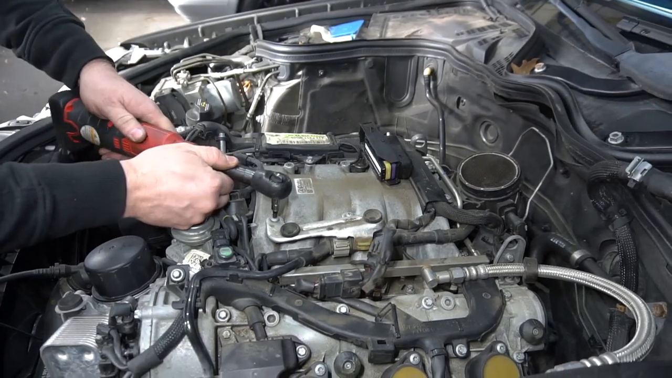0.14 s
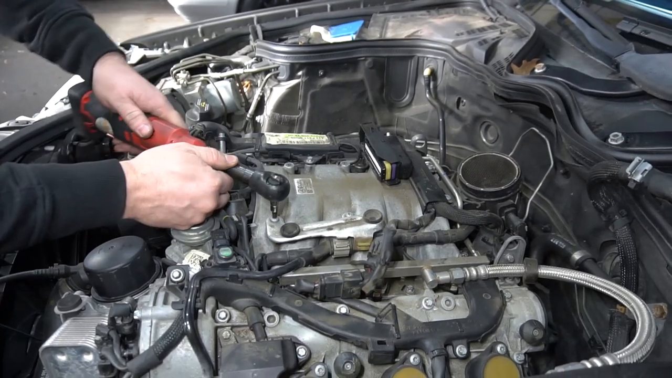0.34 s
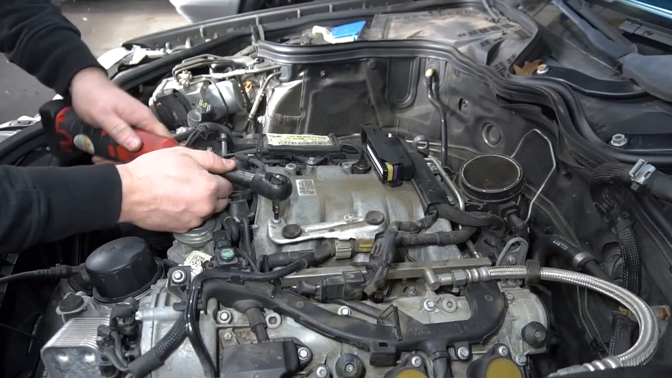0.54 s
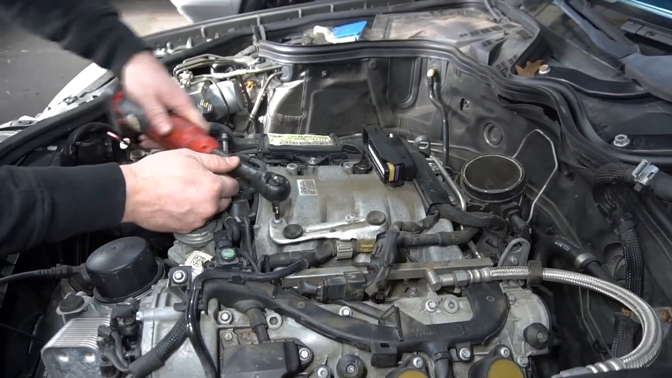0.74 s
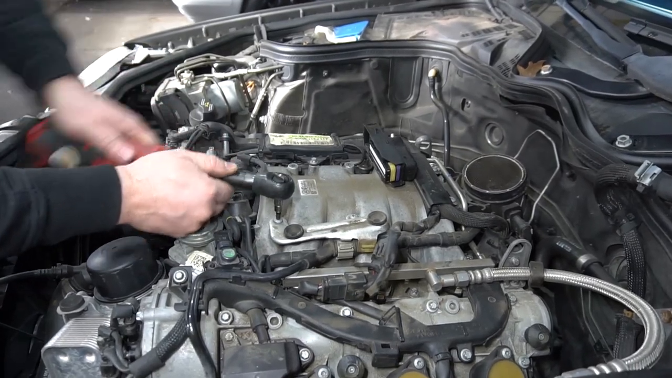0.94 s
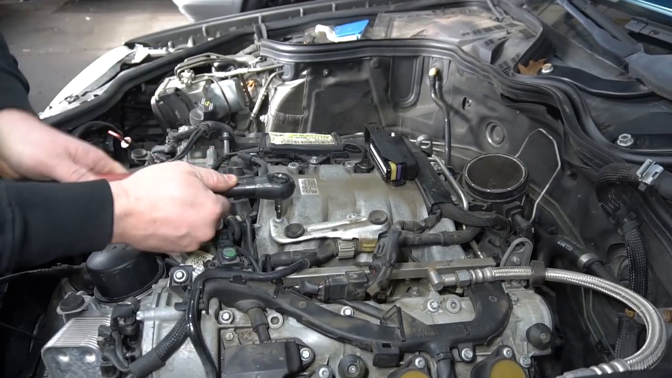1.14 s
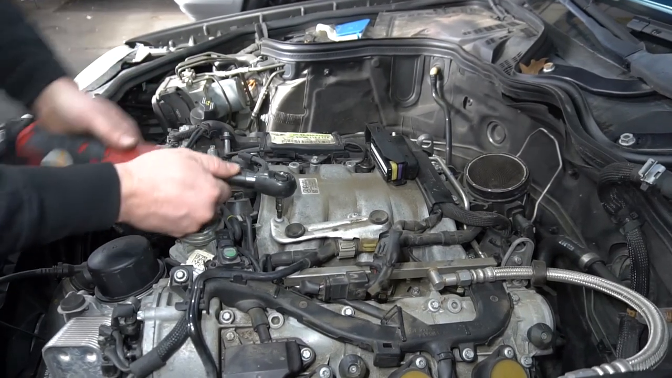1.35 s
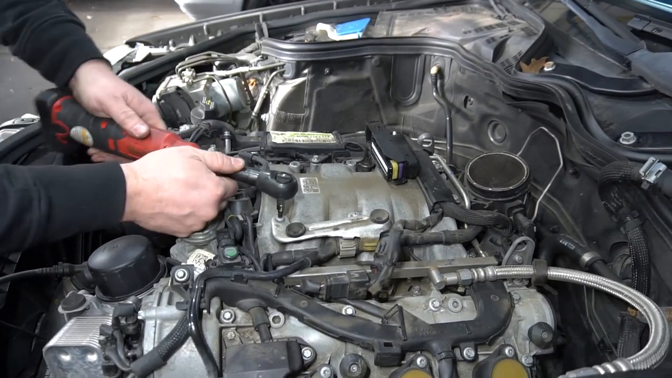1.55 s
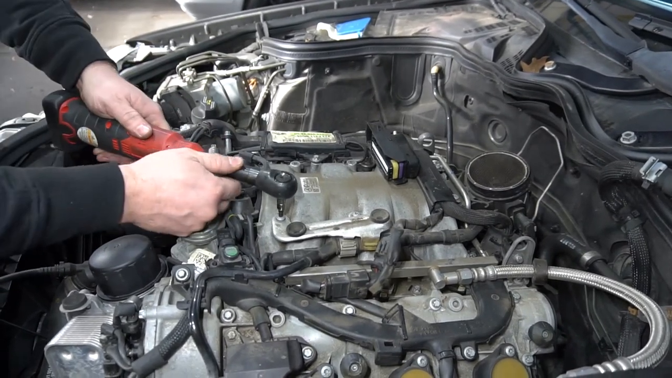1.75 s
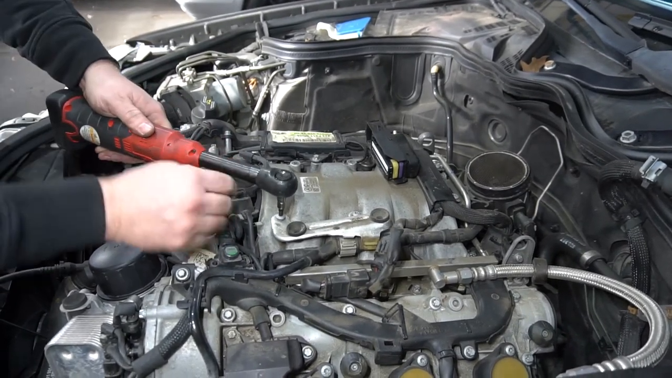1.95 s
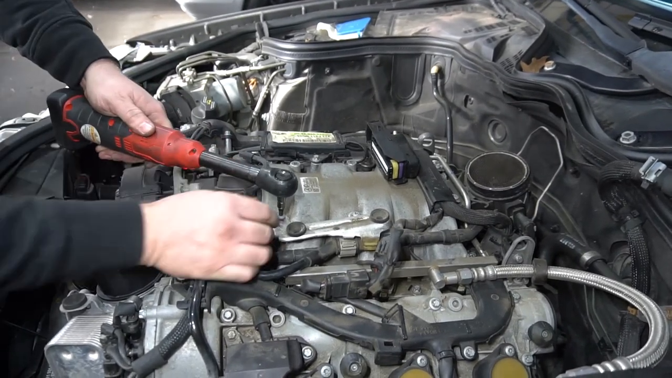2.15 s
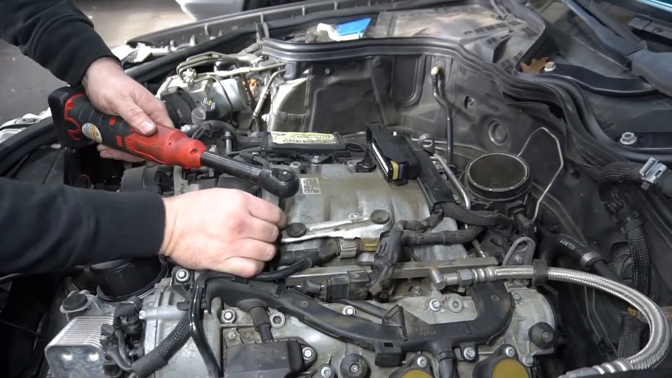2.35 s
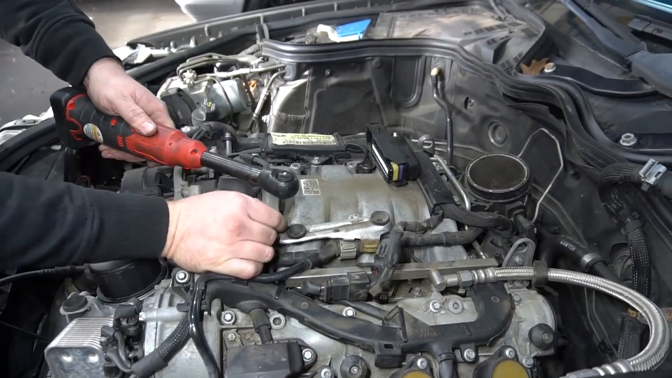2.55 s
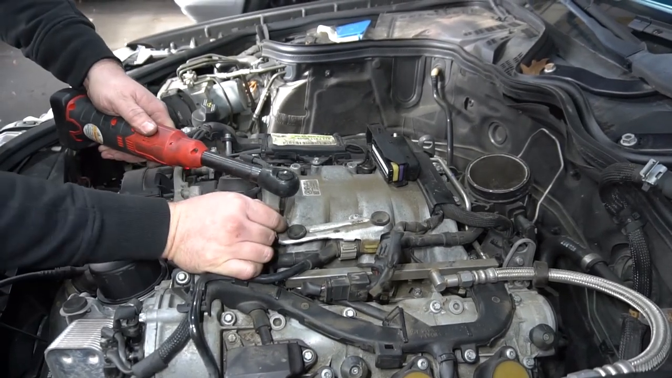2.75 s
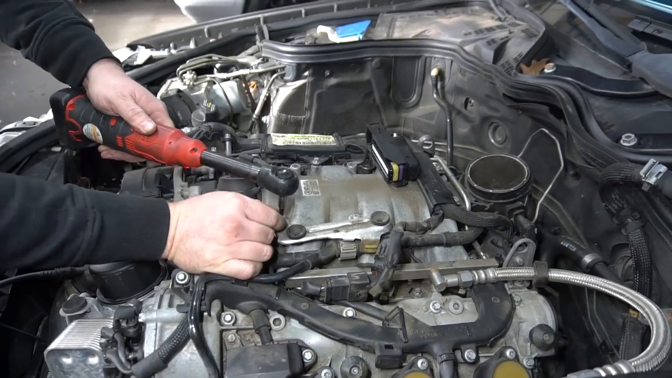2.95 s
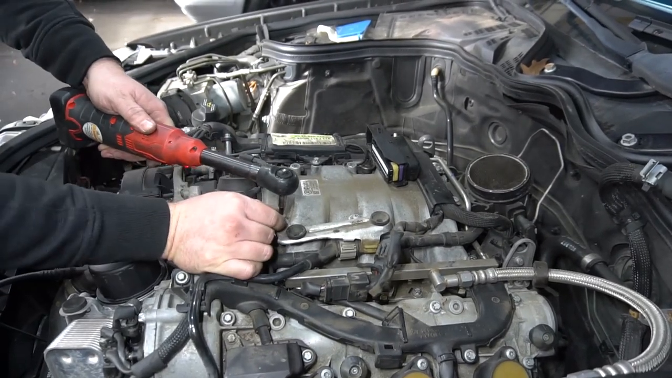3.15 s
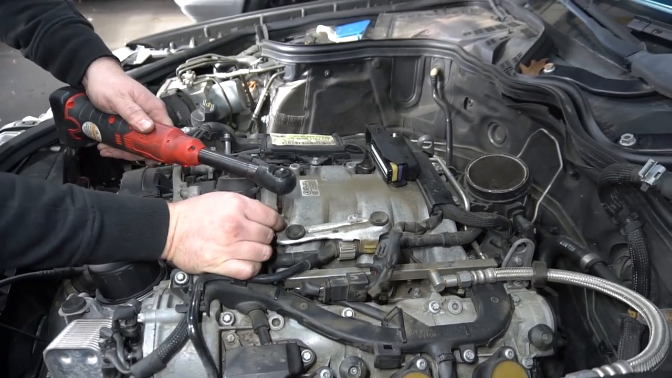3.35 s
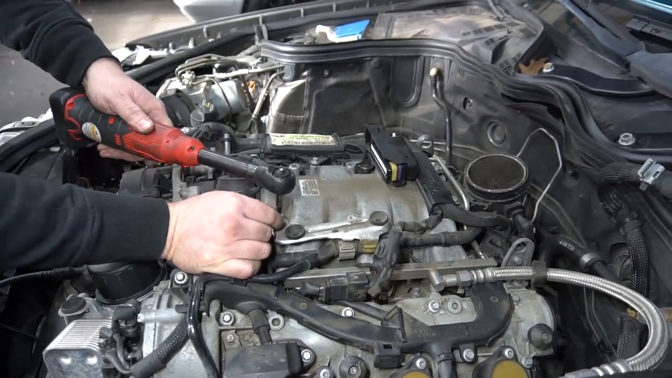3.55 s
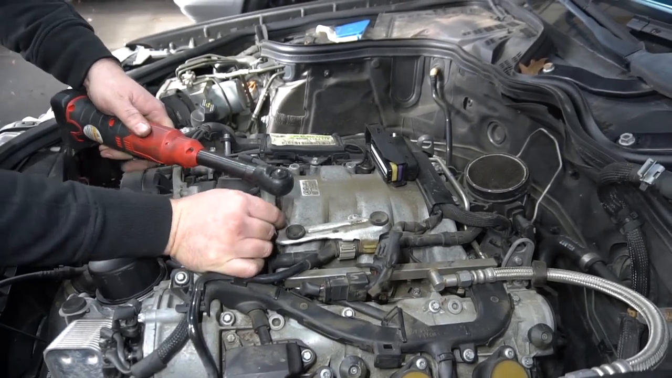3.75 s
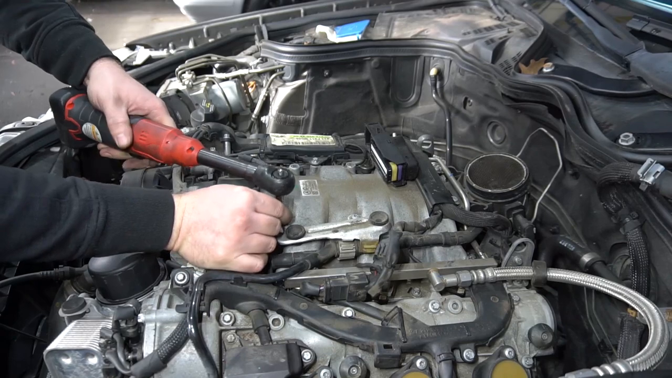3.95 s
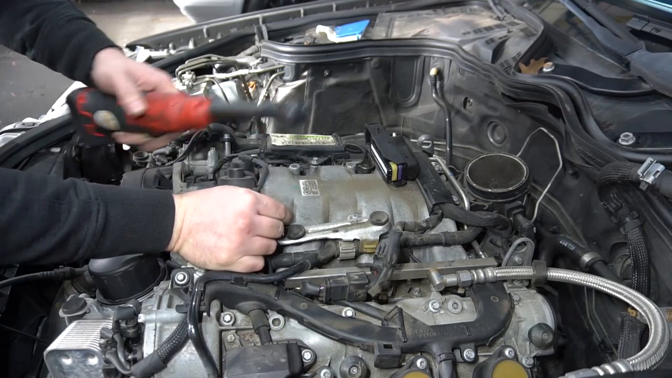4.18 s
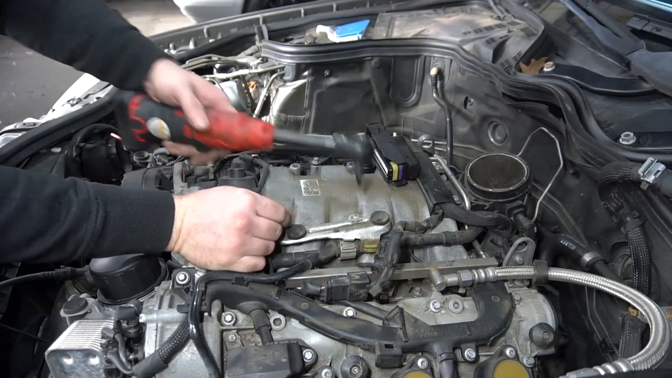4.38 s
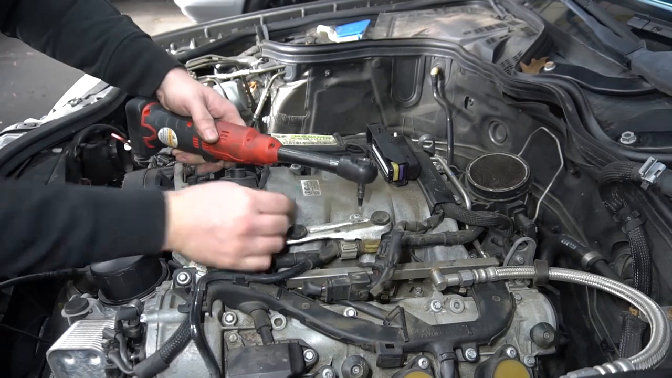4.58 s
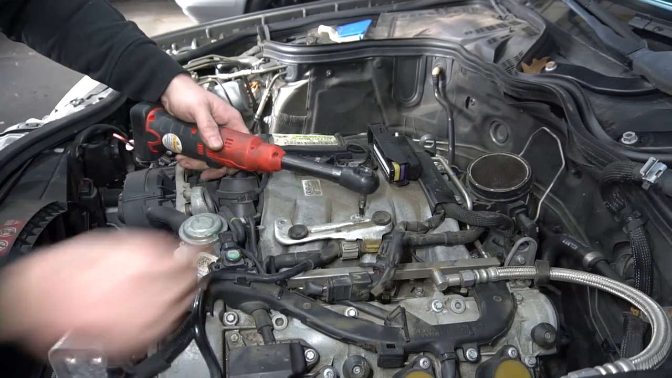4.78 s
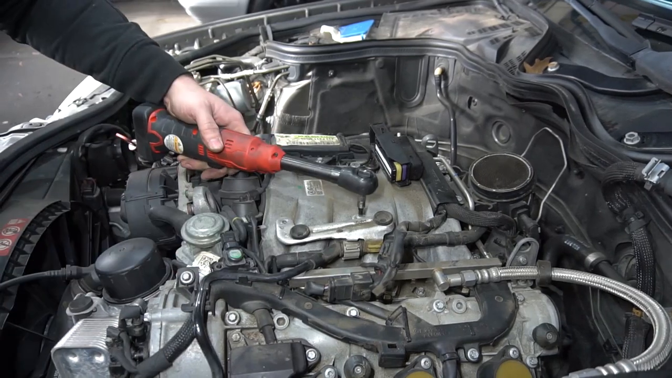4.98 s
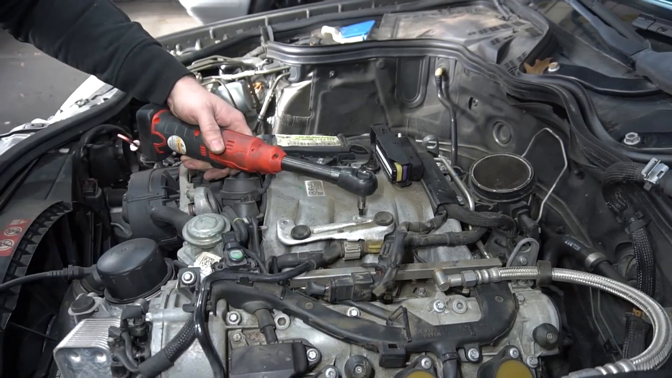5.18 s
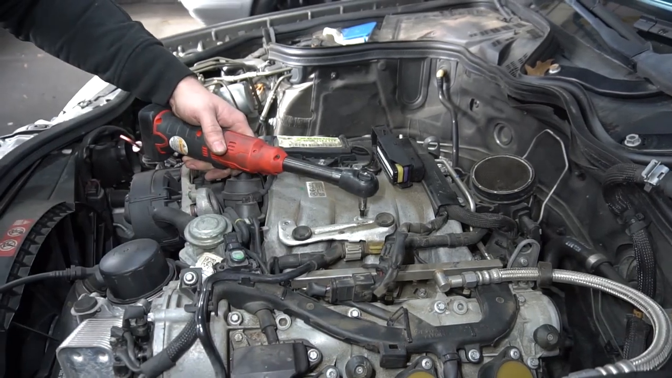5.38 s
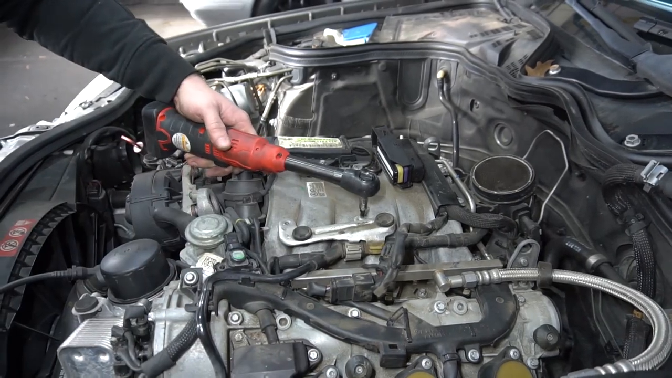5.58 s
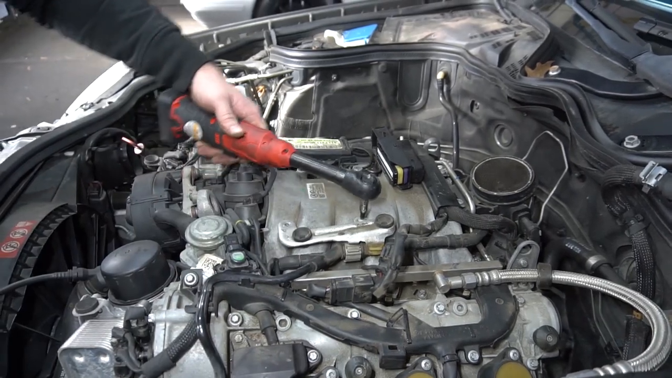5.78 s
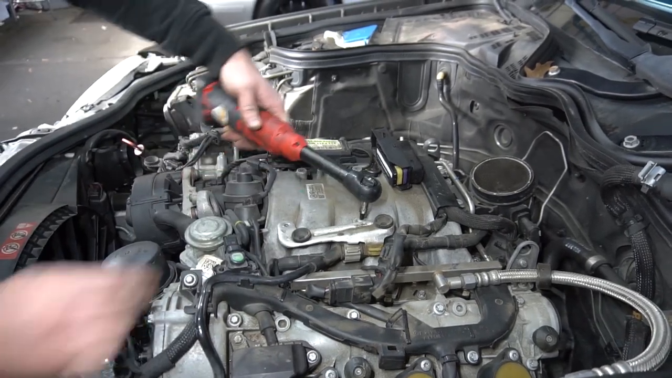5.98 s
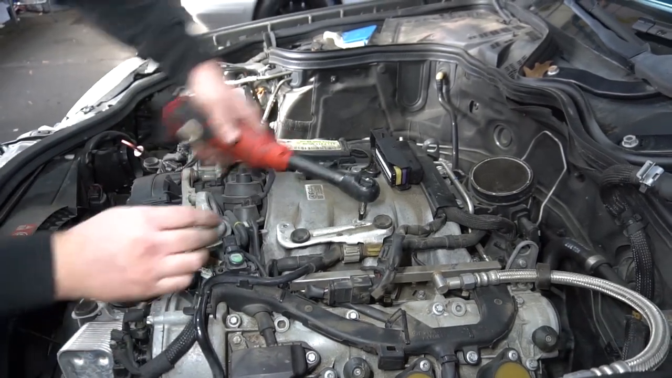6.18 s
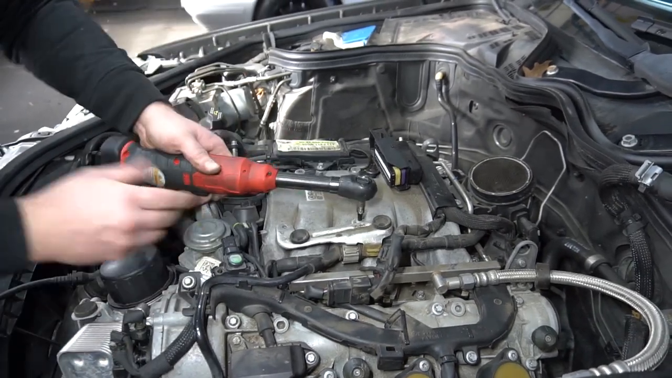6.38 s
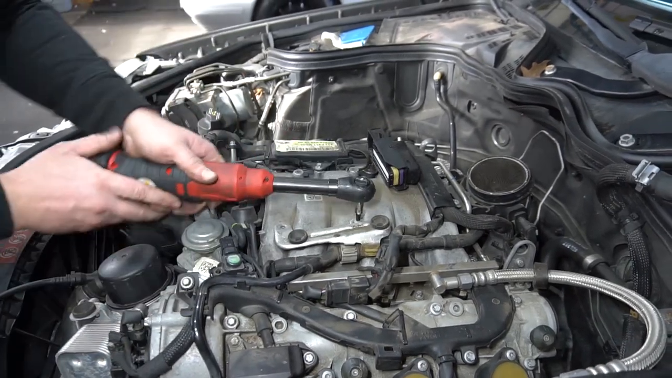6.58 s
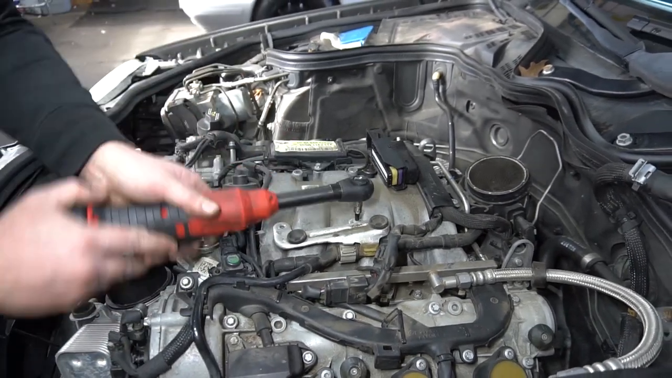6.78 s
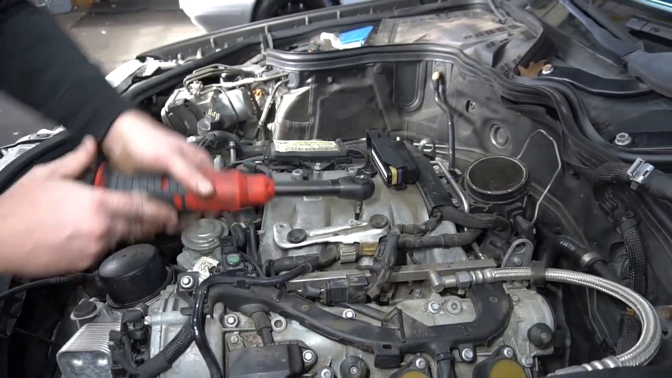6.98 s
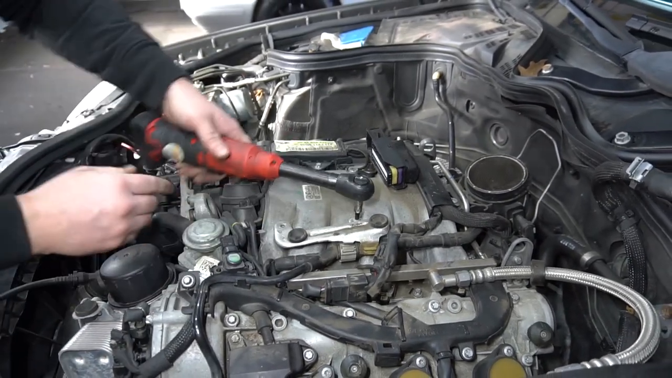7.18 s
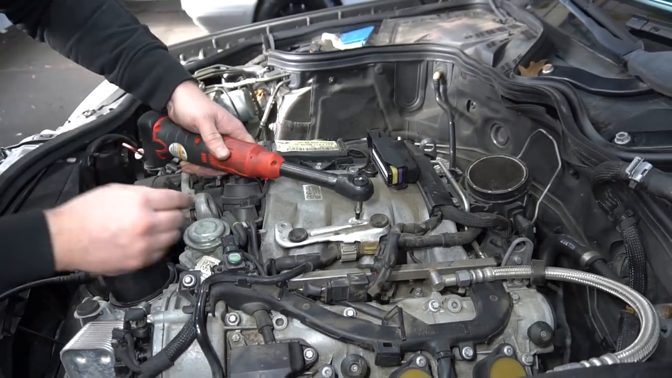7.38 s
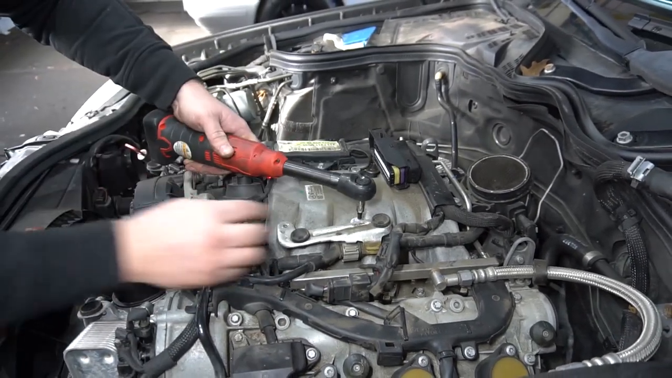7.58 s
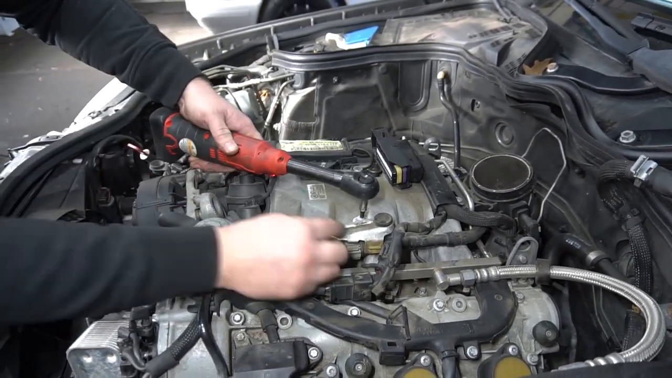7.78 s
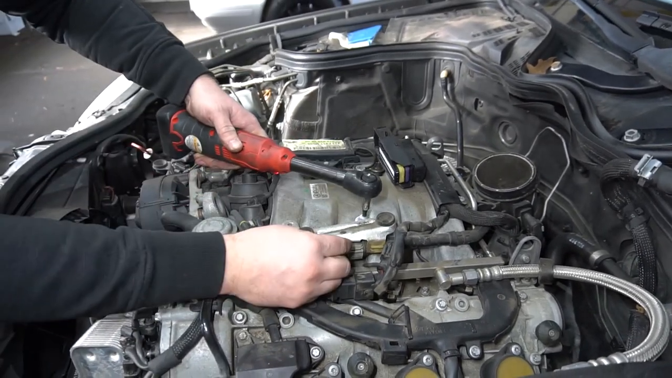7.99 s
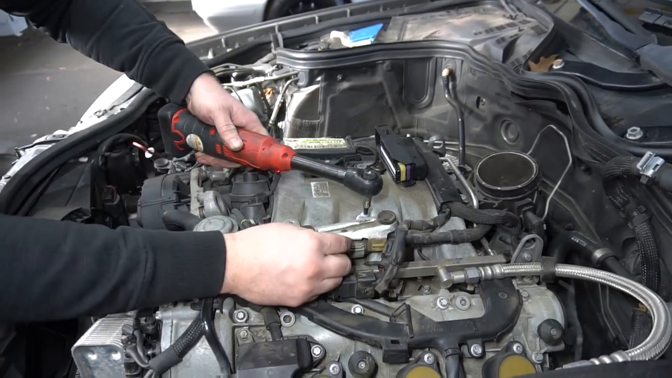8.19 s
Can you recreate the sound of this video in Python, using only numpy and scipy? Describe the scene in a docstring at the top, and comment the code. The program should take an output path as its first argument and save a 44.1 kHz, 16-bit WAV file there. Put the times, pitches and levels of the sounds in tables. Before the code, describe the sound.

Close stereo pickup in a moderately reverberant workshop. A few small metal clicks and a sharp clack precede a long, harsh electric ratchet run with gear whine and rapid knocking. It winds down into loose clacks. A bolt drops, knocks a hollow panel and rings on metal. After light tool clicks, the ratchet bursts again to the end. A low machine hum sits beneath, ducking under the tool.

```python
"""A cordless electric ratchet backs bolts out of an engine in two runs, close by, in a workshop.
Its crank turns about 104 times a second at full speed: knocks, rasp noise, buzz lines and gear whine.
Separate clicks and scrapes are filtered noise; a dropped bolt cracks and rings in decaying modes.
A machine drone of noise and wavering sines lies beneath; gain control ducks it under the tool
and lets it swell back slowly."""
import sys
import numpy as np
from scipy import signal
from scipy.fft import rfft, irfft, next_fast_len
from scipy.io import wavfile
from scipy.ndimage import uniform_filter1d

SR = 44100
rng = np.random.default_rng(int(sys.argv[2]) if len(sys.argv) > 2 else 0)


def generate_wav(signal):
    """Clip the signal to [-1, 1] and save it as 16-bit WAV at the path in sys.argv[1]."""
    frames = np.transpose(np.atleast_2d(signal))
    scaled = np.clip(frames, -1, 1) * 32767
    pcm = np.round(scaled).astype(np.int16)
    wavfile.write(sys.argv[1], SR, pcm)


N = 362943
TIME = np.arange(N) / SR

# contacts in one crank turn: [phase/turn, relative level/dB]
CONTACTS = [(0.019, -6), (.14, 5), (.47, 0), (0.724, -2)]
# stereo width of tool and handling: [f/Hz, side re mid/dB]
TOOL_SIDE = [(60, 1), (140, -14.5), (350, -14.5), (840, -12.5), (2020, -11.5), (4880, -0.5), (11800, -1)]
# crank turns per s: free running, and stalled
FREE_HZ, STALL_HZ = 104.4, 12


def amp(db):
    """Decibels to gain."""
    return 10 ** (np.asarray(db) / 20)


def unit(x):
    """Scales to an rms of 1."""
    return x / np.sqrt(np.mean(x ** 2) + 1e-20)


def read(points, hz):
    """Interpolates a spectrum table on a log-frequency axis."""
    f, value = np.transpose(points)
    return np.interp(np.log(hz + 1), np.log(f + 1), value)


def lifts(rings, hz):
    """The dB that a set of resonances adds at each frequency."""
    return sum(db / (1 + (2 * (hz - f) / width) ** 2) for f, width, db in rings)


def colour(x, db_at):
    """Filters by a rule that gives dB for each frequency."""
    size = next_fast_len(x.shape[-1] + 512, True)
    gain = amp(db_at(np.fft.rfftfreq(size, 1 / SR)))
    return irfft(rfft(x, size) * gain, size)[..., :x.shape[-1]]


def band(x, hz, width_hz):
    """The part of a sound that one resonance passes."""
    return signal.lfilter(*signal.iirpeak(hz, hz / width_hz, SR), x)


def band_rms(x, lo_hz, hi_hz):
    """The rms of one band of a sound."""
    sos = signal.butter(4, [lo_hz, hi_hz], "band", fs=SR, output="sos")
    return np.std(signal.sosfilt(sos, x))


def wander(rate_hz):
    """Random curve of rms 1 through rate_hz knots per s; constant once 4096 knots are used up."""
    knots = rng.standard_normal(4096)
    return unit(np.interp(TIME * rate_hz, np.arange(len(knots)), knots))


def add(mix, s, sound):
    """Mixes a sound in at time s."""
    part = mix[..., max(round(s * SR), 0):][..., :sound.shape[-1]]
    part += sound[..., :part.shape[-1]]


def spread(pair, side):
    """Two unrelated versions of a sound become its middle and its sides."""
    wide = colour(pair[1], lambda hz: read(side, hz))
    return np.array([pair[0] + wide, pair[0] - wide])


def scatter(t60_s, rise_s, size=4096):
    """A scattered blow: two dense, evenly coloured decays of energy 1."""
    t = np.arange(size) / SR
    shape = amp(-60 * t / max(t60_s, .002)) * (1 - np.exp(-t / max(rise_s, 1e-5))) ** 2
    x = rng.standard_normal((2, size)) * shape
    # alternate between a flat spectrum and the wanted envelope
    for _ in range(3):
        x = irfft(np.exp(1j * np.angle(rfft(x))))
        x *= shape / np.sqrt(abs(uniform_filter1d(x ** 2, 96)) + 1e-14)
    return x / np.linalg.norm(x, axis=1, keepdims=True)


def ratchet(run, body, rings, pawl_modes, buzz, lean, knock_db, rasp_db, buzz_db, whine_db,
            level_db, treble_db, rasp_decay_turns, flutter_db, flare_db, swell_rad):
    """One run: knocks and gear rasp ring the tool; crank buzz and gear whine follow its speed."""
    # dB for each halving of crank speed
    slow_level_db, slow_treble_db, slow_knock_db = -8, -1.5, -4
    # swings in dB, taken with this sign where the socket rubs hardest, opposite half a turn later
    wobble_level_db, wobble_treble_db, wobble_knock_db, wobble_buzz_db = -1.2, 0.8, -2, 4.5
    crank_per_socket, mesh_per_crank = 20, 41.6
    on, off, drag_hz, rub_s = run
    crank_hz = crank_speed(on, off, drag_hz)
    running = (TIME > on) & (crank_hz > STALL_HZ)
    turns = np.cumsum(crank_hz * running) / SR
    halvings = np.log2(FREE_HZ / crank_hz)
    socket_rad = 2 * np.pi * (turns - np.interp(rub_s, TIME, turns)) / crank_per_socket
    wobble = np.cos(socket_rad)

    # the slack mechanism clatters harder once the trigger is let go
    force_db = slow_knock_db * halvings + 4.5 * (TIME > off)
    hardness = amp(knock_db + force_db + wobble_knock_db * wobble + 2.4 * wander(8.1))
    strikes = knocks(turns, running, jitter_s=.000035, uneven_db=4.5, t60_s=0.021) * hardness

    # rasp is strongest at the start of each turn; its fast flutter freezes after 4.55 s
    chatter_db = flutter_db * wander(900) + wander(45)
    gate = (0.75 + np.exp(-(turns % 1) / rasp_decay_turns)) * amp(chatter_db)
    rasp = amp(rasp_db) * unit(gate) * rng.standard_normal((2, N))
    drive = (strikes + rasp) / np.hypot(hardness, amp(rasp_db))
    # last term: 9 dB shelf cut below about 520 Hz
    noise = colour(drive, lambda hz: read(body, hz) + lifts(rings, hz) - 9 / (1 + (hz / 520) ** 4))

    # each resonance flares and fades on its own as the loose socket rattles on the bolt
    for ring_hz, _, _ in rings:
        flare = unit(amp(flare_db * np.tanh(wander(80))))
        noise += band(noise, ring_hz, width_hz=450) * (flare - 1)
    noise /= band_rms(noise[0, running], 800, 5000)

    # replace the band above 5 kHz by one of set level
    treble = colour(noise, lambda hz: -20 * np.log10(1 + (5000 / (hz + 1)) ** 12))
    shine_db = treble_db + slow_treble_db * halvings + wobble_treble_db * wobble + 0.24 * wander(12)
    noise += treble * (amp(shine_db) / np.std(treble[0, running]) - 1)
    noise += pawl(pawl_modes, turns, running, socket_rad) * amp(force_db)
    # the upper mids swell once per socket turn
    noise += band(noise, 2550, 600) * (amp(2.0 * np.cos(socket_rad - swell_rad)) - 1)

    settled = (crank_hz / FREE_HZ) ** 5
    lines = crank_buzz(buzz, turns, running, wobble_buzz_db * wobble)
    whine = gear_whine(mesh_per_crank * crank_hz, on, settled, whine_db)
    # the buzz only comes out clean near full speed
    noise[0] += amp(buzz_db) * lines * settled + whine

    loudness = amp(level_db + slow_level_db * halvings + wobble_level_db * wobble)
    # the gears take up their slack with a 7 ms time constant
    take_up = (1 - np.exp(-np.maximum(TIME - on, 0) / .007)) ** 2
    out = spread(noise, TOOL_SIDE) * loudness * take_up * uniform_filter1d(running * 1., 100)
    return colour(out, lambda hz: np.outer([.5, -.5], read(lean, hz)))


def crank_speed(on, off, drag_hz):
    """Turns per s: soft start, spin-up as the bolt loosens, coast-down against friction."""
    kick_hz, friction_hz_per_s = 26, 76  # kick speed is before bolt drag
    soft_start_s, spin_up_s, loosen_s, coast_s = .025, .062, .4, .34
    driven, coasting = np.clip(TIME, on, off) - on, np.maximum(TIME - off, 0)
    # the driver feeds the current in gently
    pushed = driven - soft_start_s * (1 - np.exp(-driven / soft_start_s))
    hz = FREE_HZ - (FREE_HZ - kick_hz) * np.exp(-pushed / spin_up_s)
    hz -= drag_hz * np.exp(-driven / loosen_s)
    brake_hz = friction_hz_per_s * coast_s
    return np.maximum((hz + brake_hz) * np.exp(-coasting / coast_s) - brake_hz, STALL_HZ)


def knocks(turns, running, jitter_s, uneven_db, t60_s, count=6):
    """Knocks at set crank phases, each one of a few random noise bursts, uneven in time and force."""
    out = np.zeros((2, N))
    for share, db in CONTACTS:
        at = np.interp(np.arange(int(turns[-1])) + share, turns[running], TIME[running])
        late, force = rng.standard_normal((400, 2))[:len(at)].T
        # random variants keep the knocks from making steady lines
        variant = rng.integers(0, count, 400)[:len(at)]
        bursts = [scatter(t60_s, .0005) for _ in range(count)]
        gains = amp(db + uneven_db * np.tanh(force))
        for s, gain, k in zip(at + jitter_s * late, gains, variant):
            add(out, s, gain * bursts[k])
    return out / np.std(out[0, running])


def pawl(modes, turns, running, socket_rad):
    """Once per crank turn the pawl snaps over a tooth and pings, uneven in pitch and force."""
    rise_s, t60_s, detune_share, uneven_db = .001, .014, .03, 4
    swing_range_db, lag_rad = 2.5, 0.44  # strongest near the socket's free side
    out, t = np.zeros((2, N)), np.arange(1024) / SR
    at = np.interp(np.arange(int(turns[-1])) + CONTACTS[1][0], turns[running], TIME[running])
    swing_db = -swing_range_db * np.cos(np.interp(at, TIME, socket_rad) - lag_rad)
    shape = (1 - np.exp(-t / rise_s)) ** 2 * amp(-60 * t / t60_s)
    for hz, db in modes:
        pings = np.zeros((2, N))
        for s, swing, (force, bend, angle) in zip(at, swing_db, rng.standard_normal((400, 3))):
            phase = 2 * np.pi * (hz * (1 + detune_share * bend) * t + np.array([[0], [angle]]))
            add(pings, s, amp(swing + uneven_db * np.tanh(force)) * shape * np.sin(phase))
        out += amp(db) * pings / np.std(pings[0, running])
    return out


def crank_buzz(buzz, turns, running, wobble_db):
    """Harmonics locked to the crank, swelling once per socket turn, with wandering phase."""
    lines = np.zeros(N)
    for order, db in buzz:
        phase = 2 * np.pi * (order * turns[running] + rng.random())
        swell_db = wobble_db[running] + 1.5 * wander(28)[running]
        lines[running] += amp(db + swell_db) * np.cos(phase + 0.74 * wander(30)[running])
    return lines


def gear_whine(mesh_hz, on, settled, whine_db):
    """A tone at the tooth-mesh rate, shaped by the housing and roughened by backlash."""
    # housing response, two main resonances: [f/Hz, gain/dB]
    whine_path = [(500, -26), (950, -12), (1250, -14), (1500, -1), (1800, 4), (2250, 2), (2600, -4),
                  (3100, -6), (3450, -4), (3800, -6), (4100, 0), (4340, -1.5)]
    # under hard spin-up pull the teeth stay pressed together and whine less
    pull_db, pull_s = -4, .09
    pull = np.exp(-np.maximum(TIME - on, 0) / pull_s)
    # off full speed the teeth rattle in their backlash: phase roughness in rad
    backlash = .9 * wander(70) + (.4 + 1.3 * np.sqrt(abs(1 - settled))) * wander(500)
    whine = np.cos(2 * np.pi * np.cumsum(mesh_hz) / SR + backlash)
    flicker_db = 2.5 * np.tanh(wander(130))
    whine *= amp(whine_db + pull_db * pull + read(whine_path, mesh_hz) + flicker_db)
    # off full speed the teeth keep losing touch and the whine comes in snatches
    return whine * amp(3.5 * (1 - settled) * np.tanh(wander(110)))


def driver():
    """The chopped motor current makes the windings sing while the trigger is barely pressed."""
    # [t/s, length/s, multiple of chopping rate, level/dB]
    songs = [(0.22, 0.068, 2, -52), (0.247, 0.056, 1, -43), (0.287, 0.042, 2, -48), (1.53, 0.026, 2, -42),
             (7.391, 0.035, 2, -37), (7.393, 0.027, 1, -37)]
    chop_hz = 5015
    out = np.zeros(N)
    for s, length_s, multiple, db in songs:
        t = np.arange(int(length_s * SR)) / SR
        tone = np.sqrt(2) * np.sin(2 * np.pi * multiple * chop_hz * t)
        add(out, s, amp(db) * tone * signal.windows.tukey(len(t), .5))
    return out


def clicks(steel, dull_db, ring_width_hz):
    """Separate clicks: each noise burst wakes its own mix of metal modes, two of them leading."""
    # socket and tool on metal, the coasting crank's last pawl knocks, gears taking up slack:
    # [t/s, peak level/dB, low-band tilt/dB, high-band tilt/dB, strongest ring f/Hz, second ring f/Hz]
    events = [(0.423, -19.5, -4, -7, 3440, 5290), (0.636, -29.5, 1, -14, 3520, 4240),
              (0.6515, -29.5, 1, -15, 1520, 1900), (0.9527, -23.5, 2, -3, 3430, 2800),
              (0.999, -19.5, -4, -5, 1860, 7030), (1.0199, -8, -10, -7, 2570, 2050),
              (1.4477, -24, -17, -4.5, 3380, 4780), (1.546, -21.5, -2, 3, 10200, 5000),
              (1.567, -6, -2, 6, 3500, 1930), (4.005, -8, -2, 3, 2800, 3470),
              (4.0295, -9, 0, 5, 2850, 3380), (4.041, -10, -1, 0, 2800, 3400),
              (4.069, -10, -3, 5, 5600, 6100), (4.08, -11, -6, 5, 1950, 9700),
              (4.1374, -11, -3, -0.5, 6200, 3600), (4.1805, -20.5, -1, 7, 3560, 4600),
              (4.211, -25.5, 0, 3, 2120, 6400), (4.484, -25, -19, 0, 3700, 4300),
              (4.844, -15, -4.5, -15, 4500, 3170), (4.8778, -20.5, -4, -11, 3130, 4100),
              (5.8434, -19, -10, -14, 1920, 5400), (5.853, -22.5, 0, -10, 1790, 4700),
              (6.274, -22, -4.5, -5, 1680, 3840), (6.3385, -27, -1, -13, 1740, 2820),
              (6.384, -30.5, -2, -6, 1670, 3520), (6.6134, -11.5, -4.5, -3, 2220, 5100),
              (7.114, -18, -3, 6.5, 3700, 2100), (7.171, -14.5, -4, 1, 3700, 2060),
              (7.284, -17.5, -6, 1.5, 2060, 2200), (7.307, -31.5, -9, 0, 2950, 4640),
              (7.419, -20, 8, -4, 3780, 1050), (7.428, -14, 1, -6, 3720, 1040),
              (7.435, -11, 10, 4, 2050, 1290)]
    t60_s, rise_s = 0.026, 0.00065
    first_db, second_db, mode_spread_db, pan_db = 11.5, 7, 2.5, -0.5
    out = np.zeros((2, N))
    for s, db, low, high, first_hz, second_hz in events:
        tint = [(60, low - 45), (200, low - 26), (900, low + dull_db), (2000, low), (4000, -1), (8000, high - 6)]
        blow = colour(scatter(t60_s, rise_s), lambda hz: read(tint, hz))
        # the strength of each mode varies from click to click
        vary_db = mode_spread_db * rng.standard_normal(len(steel))
        ring = sum(amp(a + vary) * band(blow, hz, width) for (hz, width, a), vary in zip(steel, vary_db))
        ring += amp(first_db) * band(blow, first_hz, ring_width_hz)
        ring += amp(second_db) * band(blow, second_hz, ring_width_hz)
        ring /= np.sqrt(uniform_filter1d(ring[0] ** 2, 88).max())  # peak of the 2 ms rms
        add(out, s, amp(db) * spread(ring, TOOL_SIDE))
    return out * amp([[pan_db / 2], [-pan_db / 2]])


def scrapes(steel, grain_db):
    """The socket slides over a bolt head in many small catches as it seats: grainy noise."""
    # [t/s, length/s, relative level/dB]
    slides = [(0.227, 0.044, -29), (0.409, 0.032, -30.5), (0.74, 0.031, -43), (0.964, 0.081, -33),
              (1.56, 0.068, -14), (4.474, 0.02, -34)]
    out = np.zeros((2, N))
    for s, length_s, db in slides:
        size = int(length_s * SR)
        add(out, s, amp(db) * rng.standard_normal((2, SR))[:, :size] * signal.windows.tukey(size, .6))
    tint = [(500, -17.5), (1700, 7.0), (3500, 5.5), (6000, -5.5), (11000, -9.0)]
    grains = out * amp(grain_db * wander(580))
    return spread(colour(grains, lambda hz: read(tint, hz) + lifts(steel, hz)), TOOL_SIDE)


def impacts(count):
    """Each landing and its quick, ever weaker rebounds: (s, dB, object, brightness dB)."""
    # [t/s, level/dB, object (0 panel, 1 metal), crack brightness/dB, rebound gap/s,
    #  offset subtracted from all rebounds/dB (negative makes them louder), further loss per rebound/dB]
    landings = [(5.4975, -9.5, 0, 6.5, 0.0039, -3.5, 9), (5.5161, -11, 0, 0, 0.011, -1, 6),
                (5.658, -11.5, 1, 7, 0.0033, -6, 11.5), (5.686, -24, 1, 2, 0.0055, -3, 8)]
    return [(s + k * gap_s, db - (k > 0) * offset_db - k * rebound_db, thing, bright_db)
            for s, db, thing, bright_db, gap_s, offset_db, rebound_db in landings for k in range(count)]


def dropped_bolt(crack_t60_s, crack_db, ring_db, panel_pan_db):
    """A bolt chatters on a hollow panel, then on metal: each impact is a crack plus struck modes."""
    # modes: [f/Hz, relative level/dB, t60/s]
    panel = [(630, -6, .07), (740, 0, 0.07), (860, 2, 0.08), (975, 1.5, 0.1), (1077, 5, 0.14),
             (1290, -14, .07), (1787, -12, 0.06), (2350, -12, 0.04), (2450, -10, 0.045), (2719, -14, .05),
             (3680, -8, 0.04), (3838, -8, 0.05), (4700, -10, 0.04), (4810, -7, 0.05)]
    metal = [(2320, -6, .1), (2430, -9, .12), (2560, -5, .15), (2740, -7, .32), (2785, -7, .36),
             (3122, -6.5, .36), (3182, -10, .33), (3811, -6, .18), (3973, -8, .34), (4110, -10, .22),
             (4791, -13, .11), (5351, -17, .11)]
    # crack spectra: [f/Hz, relative level/dB]
    panel_crack = [(60, -46), (300, -6), (560, 2), (850, 10), (1500, -0.5), (2400, 5), (3100, -1),
                   (3750, 4.5), (4300, -7), (4800, 1.5), (5600, -12), (8000, -4.5), (11000, -33)]
    metal_crack = [(60, -58), (700, -1), (2050, -0.5), (2450, 16), (4000, 9), (7000, -3.5), (11000, -19)]
    # soft bump as the panel sags: [t/s, length/s, f/Hz, level/dB]
    bump = (5.588, .035, 310, -28)
    out, t = np.zeros((2, N)), np.arange(SR // 2) / SR
    high_pass = signal.butter(2, 350, "high", fs=SR, output="sos")
    for s, db, thing, bright_db in impacts(count=5):
        modes, tint, pan_db = (metal, metal_crack, 0) if thing else (panel, panel_crack, panel_pan_db)
        ring = sum(amp(a - 60 * t / t60_s) * np.sin(2 * np.pi * (hz * t + rng.random((2, 1))))
                   for hz, a, t60_s in modes)
        ring = amp(ring_db) * signal.sosfilt(high_pass, ring * (1 - np.exp(-t / 0.00025)))
        crack = colour(scatter(crack_t60_s, 0.00038), lambda hz: read(tint, hz))
        add(ring, 0, amp(bright_db + crack_db) * crack)
        add(out, s, spread(ring, TOOL_SIDE) * amp(db + np.array([[pan_db / 2], [-pan_db / 2]])))
    s, length_s, hz, db = bump
    size = int(length_s * SR)
    add(out, s, amp(db) * 2 * np.sin(2 * np.pi * hz * t[:size]) * np.hanning(size))
    return out


def drone(hum_db, level_db):
    """A machine elsewhere in the shop: steady rushing air and a wavering hum."""
    # air spectrum: [f/Hz, relative level/dB]
    air_spectrum = [(15, -67), (25, -31.5), (64, -27.5), (92, -20), (128, -52.5), (165, -11.5), (192, 2),
                    (235, -2), (344, -2.5), (573, -0.5), (1170, -8.5), (1330, -7), (2270, -12.5),
                    (9930, -36), (11000, -39.5), (14300, -71.5), (22000, -120)]
    # stereo width: [f/Hz, side re mid/dB]
    air_side = [(60, -11), (140, -34.5), (350, -20), (840, -10.5), (2020, -5), (4880, -1.5), (11800, 2)]
    # hum lines: [f/Hz, relative level/dB]
    hum = [(71, -29.5), (120, -20), (143, -15.5), (197, -13), (242, -5.5), (310, -10), (425, -6),
           (584, -6.5)]
    air = colour(rng.standard_normal((2, N)), lambda hz: read(air_spectrum, hz))
    air *= amp(.6 * wander(14)) / band_rms(air[0], 130, 480)
    for hz, db in hum:
        waver = amp(db + hum_db + 1.6 * wander(5.9))
        air[0] += waver * np.sin(2 * np.pi * hz * TIME + 1.0 * wander(8))
    return spread(air, air_side) * amp(level_db)


def room(x):
    """The workshop's diffuse tail: noise, each band dying at its own speed."""
    # [f/Hz, t60/s]
    decay = [(200, 0.75), (1000, 0.87), (4000, 0.5), (11000, 0.3)]
    hz, t, z = signal.stft(rng.standard_normal((2, SR // 2)), SR, nperseg=256)
    fade = amp(-60 * t / read(decay, hz)[:, None]) * (1 - np.exp(-t / 0.0008))
    tail = signal.istft(z * fade, SR, nperseg=256)[1]
    return signal.oaconvolve(x, tail / np.linalg.norm(tail[0]), axes=1)[:, :N]


def hold(db, fall_db_per_s):
    """Follows each peak at once and sinks back at a steady rate."""
    fall = fall_db_per_s * TIME
    return np.maximum.accumulate(db + fall) - fall


def gain_control(x):
    """Turns down what passes the ceiling; after a long loud stretch gain creeps back over seconds."""
    ceiling_db, release_db_per_s = -19.5, 85
    linger_share, recover_db_per_s = 0.73, 3  # share of a long cut that lingers
    power = abs(uniform_filter1d((x ** 2).mean(0), size=530))
    over_db = np.maximum(10 * np.log10(power + 1e-12) - ceiling_db, 0)
    step = 1 / (.25 * SR)  # 0.25 s average
    lasting_db = signal.lfilter([step], [1, step - 1], over_db)
    quick_db = hold(over_db, release_db_per_s)
    slow_db = hold(linger_share * lasting_db, recover_db_per_s)
    return x * amp(-uniform_filter1d(np.maximum(quick_db, slow_db), size=130))


def scene():
    """Two runs of the ratchet, the clicks and scrapes around them, the dropped bolt and the shop."""
    # runs: [trigger pressed t/s, released t/s, speed lost to the tight bolt/(turns/s), hardest rub t/s]
    run_a = (1.556, 3.728, 3.7, 2.11)
    run_b = (7.41, 8.4, 0.8, 7.735)
    # what tool and bolt radiate: [f/Hz, relative level/dB]
    body_a = [(180, -75.5), (300, -24), (548, -21), (609, -14.5), (823, -17), (915, -12.5), (1370, -15),
              (1910, -8.5), (3010, 1.5), (3450, -2), (4100, -3.5), (4450, -7.5), (4870, -14.5),
              (8020, -19.5), (10400, -17), (11000, -26), (14300, -55), (22000, -120)]
    body_b = [(180, -58), (300, -21), (540, -24), (600, -15.5), (730, -17), (862, -17), (1020, -10),
              (1350, -10), (1650, -5.5), (2000, -1), (2630, -2.5), (4320, -2), (4660, -5.5), (10200, -12.5),
              (11000, -11.5), (14300, -52), (22000, -120)]
    # their resonances: [f/Hz, width/Hz, lift/dB]
    rings_a = [(1666, 730, 7.5), (2580, 240, -1.5), (3110, 240, -10), (3404, 150, 8), (5170, 87, 6.5),
               (7300, 740, 3), (10850, 760, 6.5)]
    rings_b = [(1350, 140, 10), (1710, 180, -9), (1970, 300, 2.5), (2660, 250, -3), (3220, 440, 2.5),
               (5000, 300, 2.5), (6930, 500, 2.5), (10060, 740, 6)]
    # pawl pings: [f/Hz, relative level/dB]
    pawl_a = [(1850, -13), (2600, -14), (3430, -3.5)]
    pawl_b = [(1340, -13), (2030, -11.5), (3250, -12.5)]
    # crank buzz: [multiple of crank speed, relative level/dB]
    buzz_a = [(6, -19.5), (7, -15.5), (9, -10), (11, -5.5), (12, -7), (14, -4.5), (17, -2.5), (18, 2),
              (19, -5.5), (24, -8.5), (26, -1.5), (36, 6), (38, 2)]
    buzz_b = [(7, -14.5), (13, -13), (14, -21), (18, 1), (19, 0), (21, -9), (30, 1), (33, 4), (38, 3)]
    # stereo lean: [f/Hz, left re right/dB]
    lean_a = [(60, -3), (130, -0.5), (270, 1), (580, -0.5), (1220, 1), (2600, -3), (5530, 0), (11800, 1.5)]
    lean_b = [(60, 4), (130, 0), (270, -5), (580, 2), (1220, -1.5), (2600, -5.5), (5530, -2.5), (11800, 0)]
    # steel resonances: [f/Hz, width/Hz, relative level/dB]
    steel = [(1710, 160, -4.5), (2050, 210, 1.5), (2405, 180, 3.5), (2795, 170, 0.5), (3040, 70, -1.5),
             (3510, 170, 2.5), (4030, 200, 0.5), (4660, 260, 0.5), (5280, 200, 3.5), (6060, 790, 2),
             (6980, 620, -0.5), (8500, 1100, 0.5), (9360, 350, -2.5), (10000, 360, 1.5)]
    first = ratchet(run_a, body_a, rings_a, pawl_a, buzz_a, lean_a,
                    knock_db=1.0, rasp_db=-2, buzz_db=-14.5, whine_db=-2.0, level_db=-4.5, treble_db=1.5,
                    rasp_decay_turns=0.16, flutter_db=2.5, flare_db=4.0, swell_rad=2.0)
    second = ratchet(run_b, body_b, rings_b, pawl_b, buzz_b, lean_b,
                     knock_db=5.5, rasp_db=3.5, buzz_db=-15.5, whine_db=-0.5, level_db=-2.0, treble_db=2.5,
                     rasp_decay_turns=0.12, flutter_db=5, flare_db=3.5, swell_rad=3.7)
    tool = first + second + driver()
    handling = clicks(steel, dull_db=-1.5, ring_width_hz=110) + scrapes(steel, grain_db=-2.5)
    bolt = dropped_bolt(crack_t60_s=0.049, crack_db=21.0, ring_db=-8.5, panel_pan_db=1.5)
    wet = room(amp(-9.0) * tool + amp(-14) * handling + amp(-11.5) * bolt)
    return tool + handling + bolt + wet + drone(hum_db=-1.0, level_db=-39.5)


def record(dry):
    """Gain control ducks the drone under the tool; peaks are rounded off; a low-pass limits the band."""
    edge_hz = 11100
    held = gain_control(dry)
    rounded = held / (1 + (abs(held) / .66) ** 10) ** .1
    low_pass = signal.firwin(801, edge_hz, window=("kaiser", 8), fs=SR)
    return signal.oaconvolve(rounded, low_pass[None], "same")


dry = scene()
out = record(dry)
generate_wav(out)
```